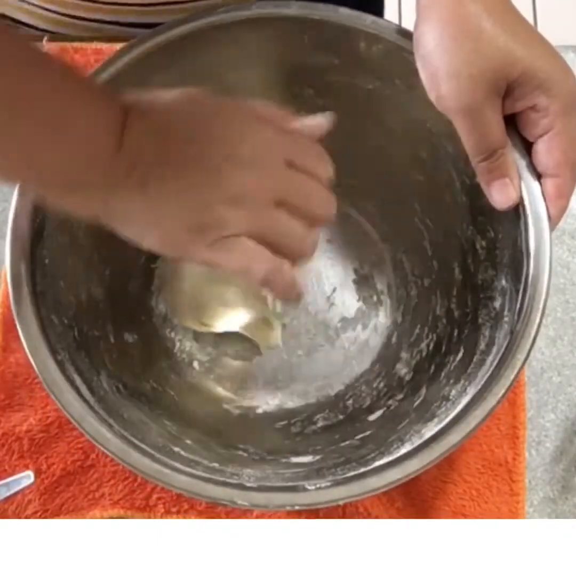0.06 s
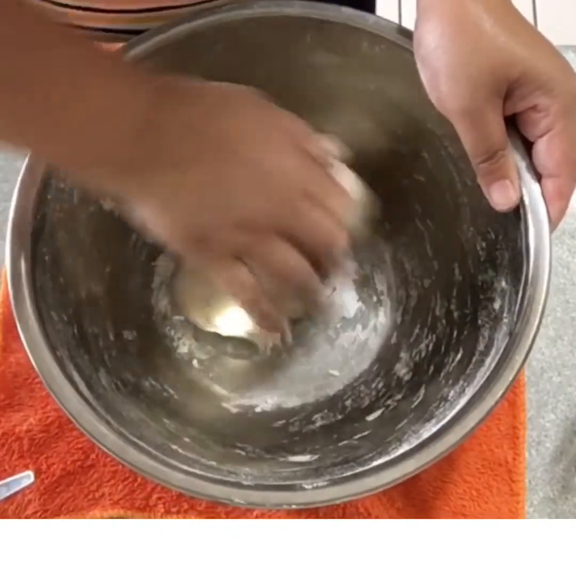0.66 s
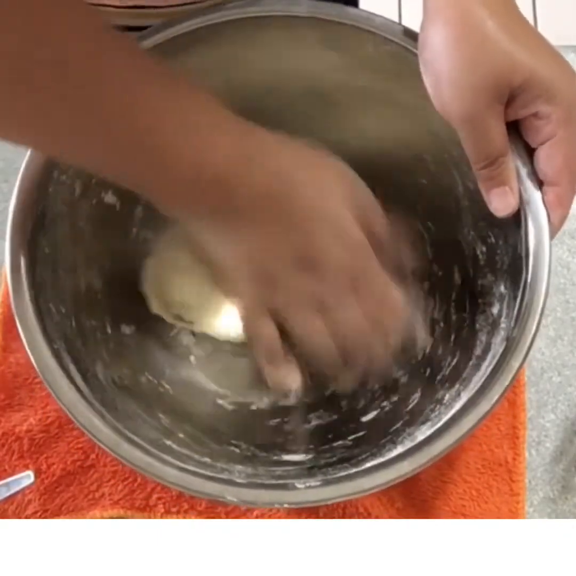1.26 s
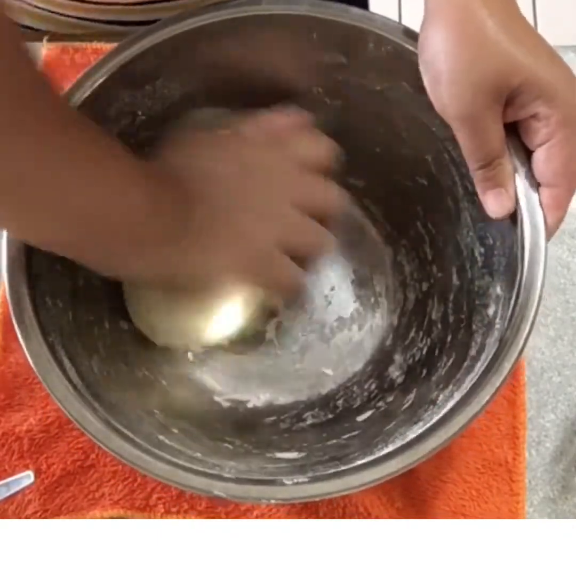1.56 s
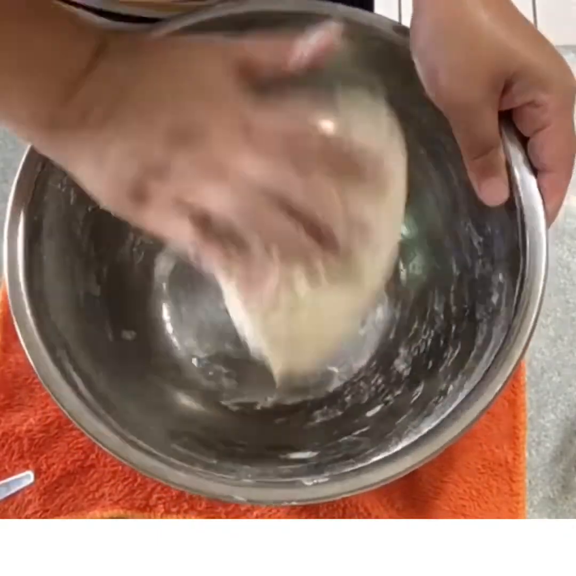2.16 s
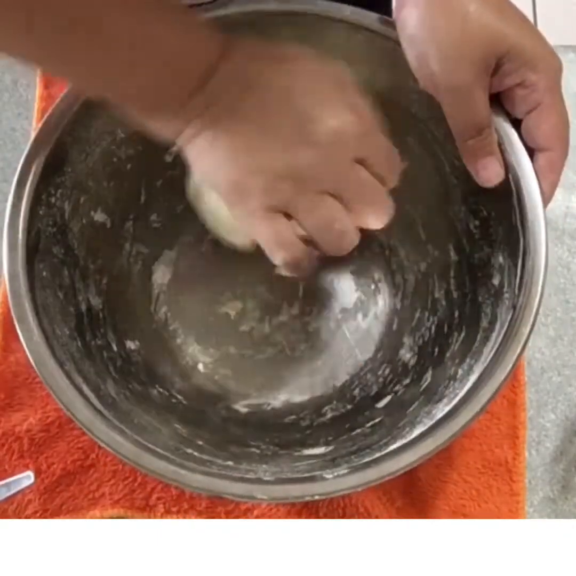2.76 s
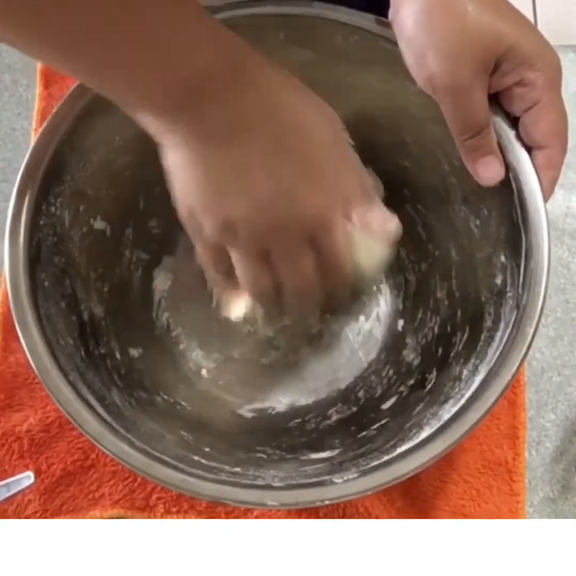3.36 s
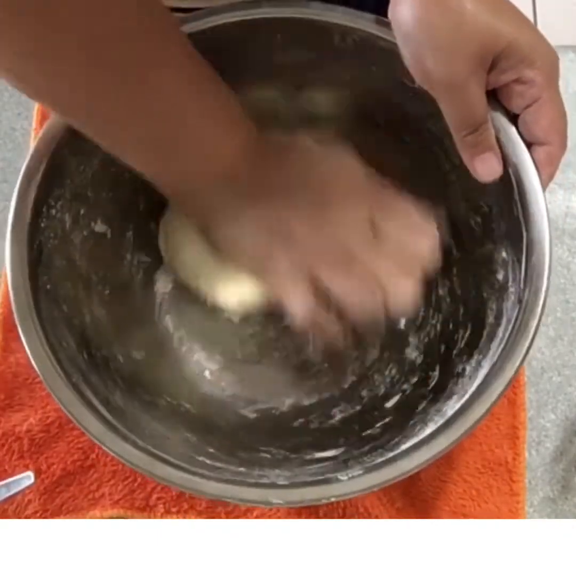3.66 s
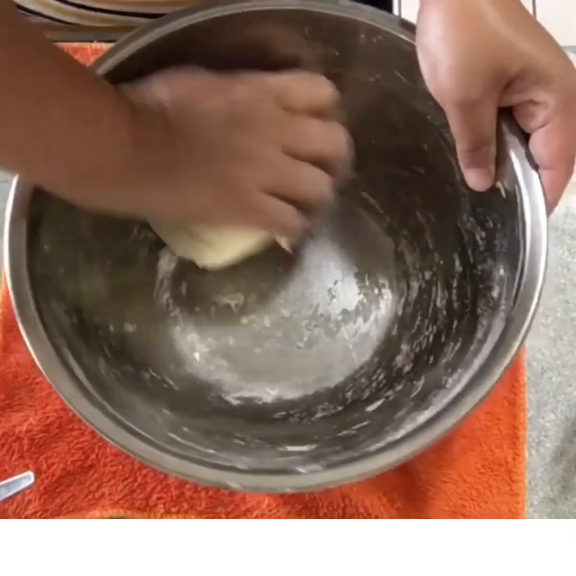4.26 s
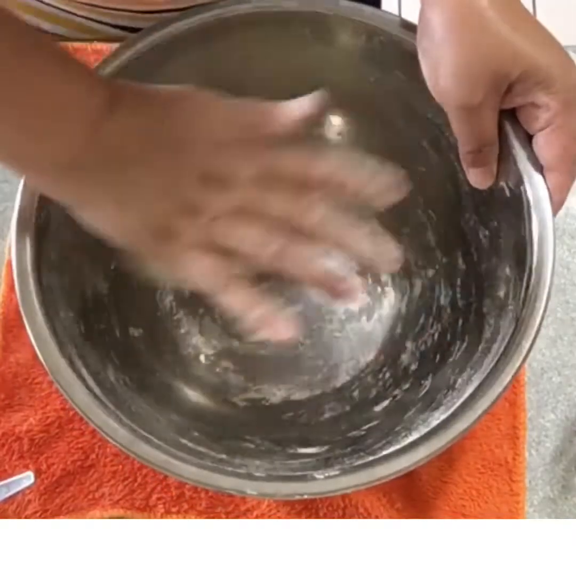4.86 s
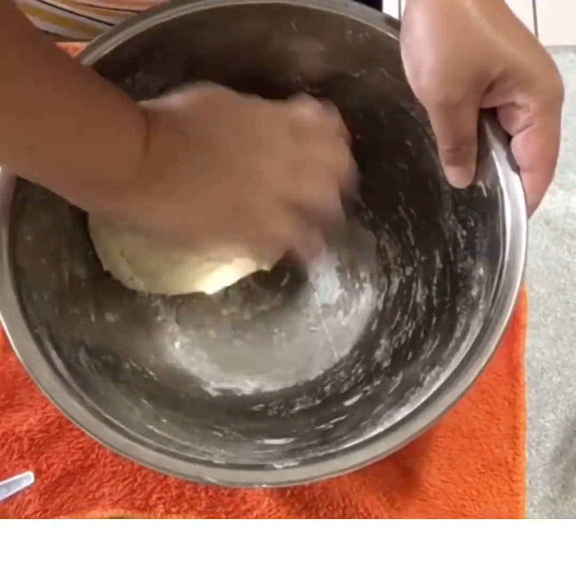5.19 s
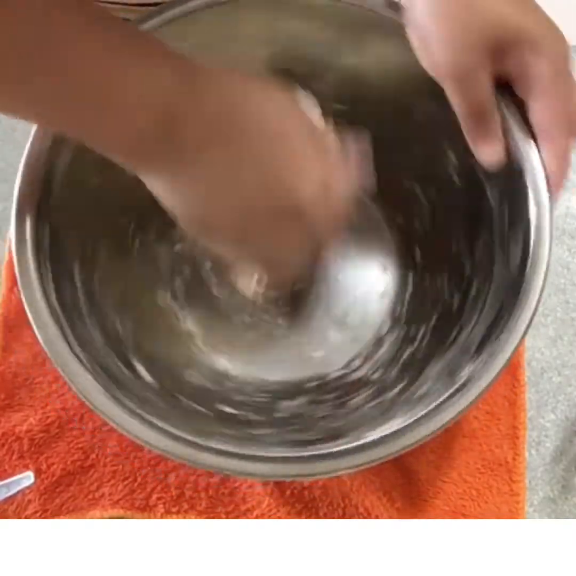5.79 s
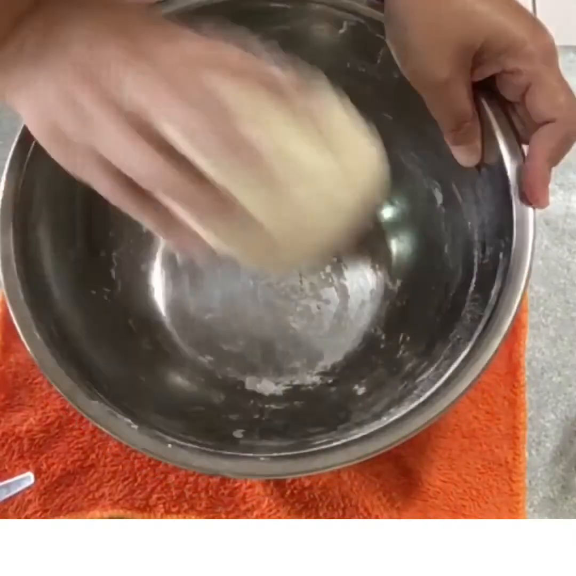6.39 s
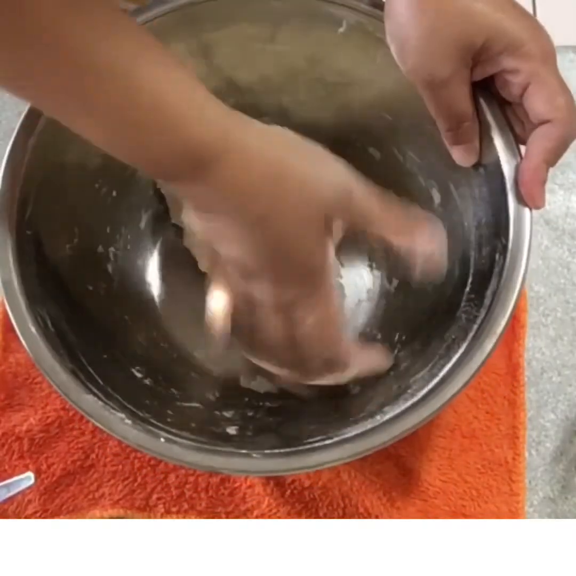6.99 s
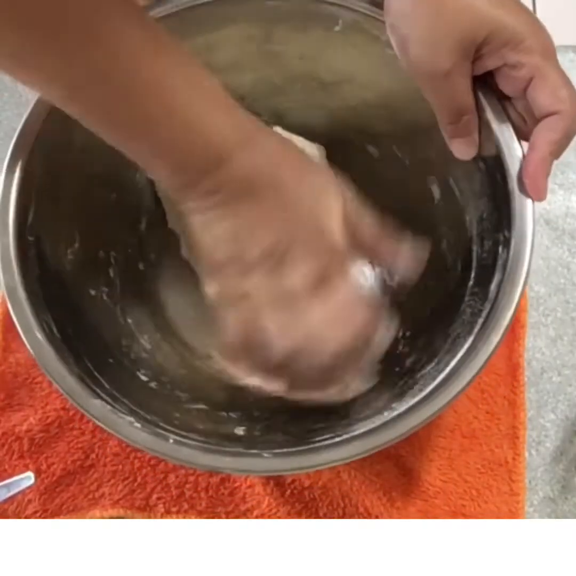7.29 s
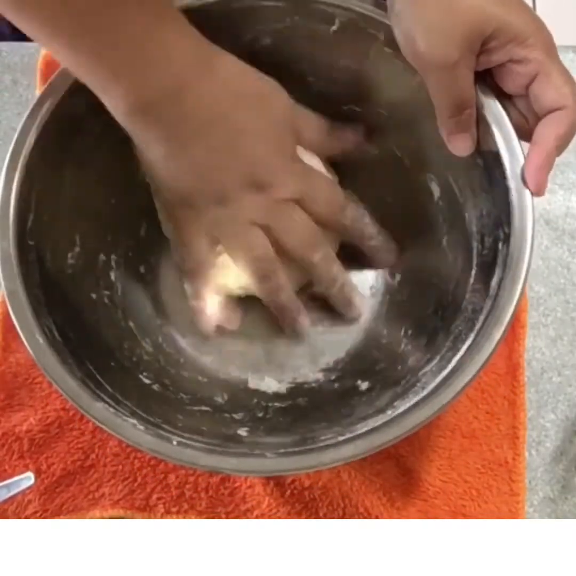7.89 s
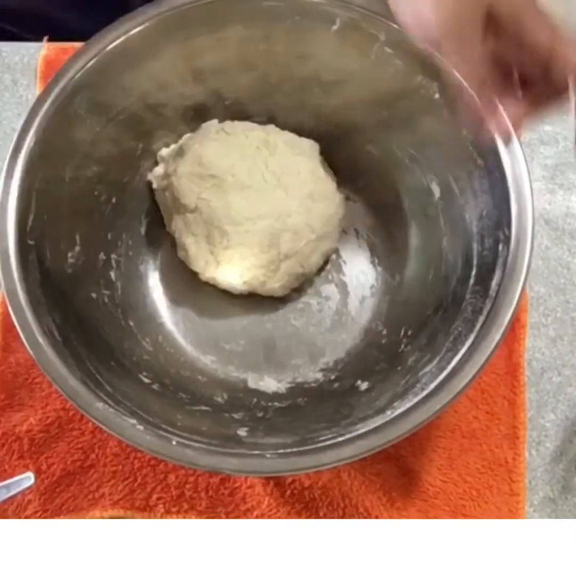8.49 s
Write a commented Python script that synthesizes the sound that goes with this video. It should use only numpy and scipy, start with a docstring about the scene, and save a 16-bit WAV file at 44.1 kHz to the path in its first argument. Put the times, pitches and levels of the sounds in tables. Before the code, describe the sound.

Dough rubs and squelches quietly against a metal mixing bowl, broken by low thumps and pats as it is dropped and pressed.

```python
"""In a small kitchen, a hand kneads dough in a steel bowl that stands on a towel.
Friction of skin and dough on the wall hisses and rasps. The ball is dropped and patted: each impact
expels trapped air or thuds through the table, and a finger ring excites the modes of the steel.
The bowl is turned once, scraping; a soft hiss swells near the end."""
import sys
import numpy as np
from scipy import signal
from scipy.fft import rfft, irfft, next_fast_len
from scipy.io import wavfile
from scipy.ndimage import uniform_filter1d

SR = 44100
rng = np.random.default_rng(int(sys.argv[2]) if len(sys.argv) > 2 else 0)


def output_pcm(signal):
    """Save a mono or channel-first signal as 16-bit PCM at the path in sys.argv[1].

    Samples are clipped to [-1, 1] before scaling.
    """
    pcm = np.clip(np.atleast_2d(signal).T, -1, 1) * 32767
    wavfile.write(sys.argv[1], SR, np.round(pcm).astype(np.int16))


N = 376505


def amp(db):
    """Amplitude grows tenfold every 20 dB."""
    return 10 ** (np.asarray(db) / 20)

def unit(x):
    """Normalisation to rms 1."""
    return x / np.sqrt(np.mean(x ** 2) + 1e-20)

def along(points, hz):
    """Interpolation of (frequency, value) points on a logarithmic axis."""
    f, v = np.transpose(points)
    return np.interp(np.log(hz + 1), np.log(f), v)

def filtered(x, response):
    """Linear filtering multiplies the spectrum by a frequency response."""
    m = next_fast_len(len(x) + len(x) // 20, True)
    return irfft(rfft(x, m) * response(np.fft.rfftfreq(m, 1 / SR)), m)[:len(x)]

def coloured(x, spectrum):
    """Spectral shaping, at rms 1."""
    return unit(filtered(x, lambda hz: amp(along(spectrum, hz))))

def resonant(x, peaks):
    """Forced response of damped resonators of alternating sign, at rms 1."""
    def response(f):
        return sum((-1) ** k * amp(db) * 1j * f * width / (hz * hz - f * f + 1j * f * width)
                   for k, (hz, width, db) in enumerate(peaks))
    return unit(filtered(x, response))

def crackle(count, spread_db):
    """Stick-slip noise: dense tiny slips of log-normal size."""
    noise = rng.standard_normal(count)
    sizes = amp(spread_db * rng.standard_normal(count // 16 + 1))
    return noise * np.repeat(sizes, 16)[:count]

def add(track, start_s, sound):
    """Superposition of a sound on a track."""
    start = round(start_s * SR)
    track[start:start + len(sound)] += sound[:N - start]

def clock():
    """Envelopes vary slowly, so a coarse time axis in seconds serves."""
    return np.arange(0, N, 64) / SR

def smooth(gain):
    """Linear interpolation of an envelope to every sample."""
    return np.interp(np.arange(N) / SR, clock(), gain)

def envelope(start, attack, hold, release, db):
    """A soft rise, a hold, then exponential decay of 20 dB per release time; times in seconds."""
    t = clock() - start
    rise = np.sin(np.pi / 2 * np.clip(t / attack, 0, 1)) ** 2
    return rise * amp(db - 20 * np.maximum(t - attack - hold, 0) / release)

# The kitchen's background. Each row: frequency in Hz, relative spectral density in dB.
RUMBLE_SPECTRUM = [(15, -37.5), (25, -6.5), (76, 3.5), (211, -10.5), (276, -4), (449, -27.5), (654, -16),
                   (769, -23), (1550, -27.5), (4210, -37.5), (4820, -42.5), (6490, -40.5), (7630, -46),
                   (13400, -50), (15800, -49.5)]
def rumble():
    """Stationary noise with its power in the bass."""
    return amp(-67.5) * coloured(rng.standard_normal(N), RUMBLE_SPECTRUM)

def tension(start, length, db, attack=0.0079, growth_db=7.5):
    """Under rising tension a pull grows louder until the dough lets go."""
    slack = np.clip(1 - (clock() - start) / length, 0, 1)
    return envelope(start, attack, length - attack, release=0.023, db=db - growth_db * slack)

def ticks(count, centre_hz, spread_db):
    """Threads of dough let go of the wall at random, each a damped oscillation of its own pitch."""
    t = np.arange(SR // 100) / SR
    when, pitch, size = rng.random((count, 3)).T[:, :, None]
    hz = centre_hz * 2 ** (2.6 * (pitch - .5))
    blips = amp(spread_db * size ** 2) * np.sin(2 * np.pi * hz * t) * np.exp(-hz * t / 2)
    where = (when * N).astype(int) + np.arange(len(t))
    return unit(np.bincount(where.ravel(), blips.ravel(), N)[:N])

def shifting_gap(x, depth_db):
    """The cavity between hand and wall changes shape, so narrow resonances come and go."""
    spectra = signal.stft(x, nperseg=512)[2]
    field = uniform_filter1d(rng.standard_normal(spectra.shape), size=4, axis=0)
    field = uniform_filter1d(field, size=12, axis=1)
    return signal.istft(spectra * unit(amp(depth_db * unit(field))), nperseg=512)[1][:N]

# Dough is pulled off the wall. Each row: start and length in seconds, relative level in dB.
DOUGH_PULLS = [(0.0, 0.1, -73.5), (0.573, .085, -71.5), (0.675, .085, -69.5), (1.29, 0.1, -65.5),
               (1.753, .095, -74), (2.637, 0.062, -70.5), (3.277, 0.083, -71.5), (3.399, 0.09, -66),
               (4.01, 0.11, -63), (4.545, 0.12, -70.5), (5.858, .09, -78), (6.027, 0.022, -64)]
# The hand's heel pushes the ball. Each row: start and hold in seconds, relative level in dB.
HEEL_PUSHES = [(0.188, 0.052, -72.5), (0.879, 0.074, -69.5), (1.529, 0.096, -73), (2.878, 0.062, -72),
               (3.592, 0.078, -75.5), (4.268, 0.12, -72), (5.269, 0.078, -80), (6.953, 0.021, -73),
               (7.347, 0.0063, -69.5)]
# The hand rubs lightly. Each row: start and hold in seconds.
LIGHT_RUBS = [(0.188, 1.66), (2.9, 1.58), (5.3, .6)]
# Fingers slide on the wall. Each row: start, rise and fall in seconds, relative level in dB.
FINGER_SLIDES = [(0.38, 0.038, 0.73, -74.5), (0.551, 0.062, 0.037, -76), (1.098, 0.028, 0.047, -52),
                 (1.15, 0.11, 0.077, -73.5), (1.292, 0.079, 0.11, -55), (2.534, 0.03, 0.056, -65.5),
                 (3.089, 0.036, 0.068, -63.5), (3.13, 0.19, 0.066, -70), (3.795, 0.022, 0.12, -68),
                 (3.99, 0.1, 0.027, -56.5), (4.11, 0.075, 0.33, -74), (5.45, 0.11, .16, -63.5),
                 (5.68, 0.092, 0.088, -69.5), (7.015, .022, 0.021, -66), (7.275, .008, 0.061, -66.5)]
# Slow skin, fast skin, smearing dough and tearing dough.
# Each row: frequency in Hz, relative spectral density in dB.
SLOW_SPECTRUM = [(3000, -21.5), (4800, -14.5), (5600, -2), (6700, 2), (7500, -7.5), (10000, -16),
                 (15000, -20.5)]
FAST_SPECTRUM = [(3000, -30), (5200, -22), (6200, -1), (6950, 5), (7700, -7.5), (9000, -9.5),
                 (10500, -27.5), (15000, -23.5)]
SMEAR_SPECTRUM = [(150, -15), (400, 2), (700, -4.5), (1050, 0.5), (1600, -1.5), (2300, -2), (3100, -3),
                  (4400, -3.5), (7000, -16.5), (14000, -16)]
RASP_SPECTRUM = [(4000, -23.5), (8500, 0), (12500, -1), (15500, -9)]
def kneading():
    """Sliding friction: skin hisses, higher when fast; tacky dough smears, ticks and rasps."""
    pull = sum(tension(*row) for row in DOUGH_PULLS)
    push = sum(envelope(s, 0.039, hold, 0.066, db) for s, hold, db in HEEL_PUSHES)
    rub = sum(envelope(s, 0.039, hold, 0.023, db=-83) for s, hold in LIGHT_RUBS)
    fingers = sum(envelope(s, rise, 0, fall, db) for s, rise, fall, db in FINGER_SLIDES)
    # Incoherent sources add in power.
    slide = smooth(np.linalg.norm([fingers, push, amp(-9.5) * pull, amp(-7.5) * rub], axis=0))
    smear = smooth(np.linalg.norm([amp(-18.5) * fingers, amp(-3.5) * push, pull, rub], axis=0))
    fast_share = slide ** 2 / (slide ** 2 + amp(-62) ** 2)  # stronger strokes turn bright
    slow_hiss = coloured(crackle(N, spread_db=2.5), SLOW_SPECTRUM)
    fast_hiss = coloured(crackle(N, spread_db=2.5), FAST_SPECTRUM)
    hiss = slide * (np.sqrt(1 - fast_share) * slow_hiss + np.sqrt(fast_share) * fast_hiss)
    dough = amp(-2) * coloured(crackle(N, spread_db=2.5), SMEAR_SPECTRUM)
    dough += amp(-5.5) * ticks(count=1400, centre_hz=2090, spread_db=23)
    tearing = amp(-15) * smooth(pull + amp(-2.5) * push)
    rasp = tearing * coloured(crackle(N, spread_db=6.5), RASP_SPECTRUM)
    return shifting_gap(amp(-1.5) * hiss + smear * dough, depth_db=3) + rasp

# The smack and its sticky edge. Each row: frequency in Hz, relative spectral density in dB.
SMACK_SPECTRUM = [(700, -31.5), (1150, 3), (1550, -10.5), (2100, -2.5), (2600, -6.5), (3400, -8.5),
                  (4500, -5.5), (5500, -20), (8000, -24), (15000, -28.5)]
STICKY_SPECTRUM = [(4000, -17), (5600, 2), (6900, 6.5), (8200, -8.5), (11000, -16.5), (15500, -25)]
def burst(smack_db, pocket_db, pocket_hz, pocket_shape, sticky_db, rise, t60):
    """A soft collision is many tiny impacts: a smack, a pop of trapped air and a sticky edge."""
    t = np.arange(SR // 10) / SR
    pocket = [(multiple * pocket_hz, db) for multiple, db in pocket_shape]
    parts = (smack_db, SMACK_SPECTRUM), (pocket_db, pocket), (sticky_db, STICKY_SPECTRUM)
    sound = sum(amp(db) * coloured(crackle(len(t), spread_db=2.5), colour) for db, colour in parts)
    return amp(-3) * sound * (1 - np.exp(-t / rise)) * amp(-60 * t / t60)

# Each row: start in seconds, relative smack and air pocket levels in dB, pocket pitch in Hz,
# relative sticky treble level in dB, 60 dB decay time in seconds.
SLAP_HITS = [(0.106, -53.5, -70, 910, -69, 0.014), (0.643, -58, -63, 800, -76, 0.02),
             (2.2652, -37, -40, 920, -47.5, 0.046), (2.287, -42, -40, 1630, -48, 0.093),
             (2.653, -64.5, -67, 700, -77, .035), (4.9292, -56, -60.5, 1010, -59.5, 0.063),
             (4.945, -42, -39.5, 1800, -55.5, 0.026), (5.949, -52.5, -53, 1080, -77.5, 0.012),
             (6.030, -73, -70.5, 600, -71, 0.053), (6.5076, -35, -26.5, 1136, -40, 0.023),
             (6.516, -34.5, -32, 1570, -56, 0.045), (6.861, -58, -53, 690, -85.5, 0.063),
             (6.867, -46.5, -52, 700, -78, 0.018), (7.2476, -50, -53.5, 750, -75, 0.023),
             (7.603, -57.5, -56, 1020, -78, 0.045), (7.935, -35, -45, 850, -39.5, 0.026),
             (7.941, -38.5, -40, 1060, -54, 0.025), (8.24, -50, -49, 614, -57, 0.056),
             (8.245, -42.5, -49.5, 1110, -67, 0.032)]
# Trapped air. Each row: multiple of the pocket's pitch, relative spectral density in dB.
SLAP_POCKET = [(.25, -6), (0.701, -14.5), (1, 1.5), (1.3, -12.5), (1.999, -20), (5, -55)]
def slaps():
    """The impact of palm or ball excites the resonance of an air pocket."""
    out = np.zeros(N)
    for s, smack_db, pocket_db, hz, sticky_db, t60 in SLAP_HITS:
        add(out, s, burst(smack_db, pocket_db, hz, SLAP_POCKET, sticky_db, rise=0.0007, t60=t60))
    return out

# Dough and hand land. Each row: start in seconds, relative level in dB, the knock's offset in dB.
LANDINGS = [(0.217, -61, -20), (0.645, -46, -18), (0.889, -40.5, -40), (2.271, -18.5, -18.5),
            (2.28, -24.5, -20), (2.577, -47.5, -28), (3.354, -46.5, -31), (3.592, -50, -18),
            (3.803, -56.5, -8), (4.289, -52, -24), (4.942, -29.5, -26.5), (6.064, -47.5, -19),
            (6.099, -40.5, -30), (6.512, -24.5, -18.5), (6.882, -38.5, -12), (7.264, -42, -28),
            (7.608, -53, -32), (7.947, -36, -25), (8.249, -38.5, -24.5)]
# The bowl rocks. Each row: frequency in Hz, relative level in dB, 60 dB decay time in seconds.
ROCKING_MODES = [(54.6, -9.5, 0.29), (77.4, -4.5, 0.18), (87.1, -0.5, 0.17), (156.1, -4, 0.095),
                 (222, -17.5, 0.06)]
# The bowl's base. Each row: frequency in Hz, relative spectral density in dB.
KNOCK_SPECTRUM = [(100, -29), (160, 6.5), (220, -10), (295, -1.5), (345, -21.5), (700, -63)]
def thuds():
    """Soft, heavy impacts knock the bowl's base and excite its low modes on towel and table."""
    out, t = np.zeros(N), np.arange(SR // 4) / SR
    for s, db, knock_db in LANDINGS:
        scatter = rng.standard_normal((len(ROCKING_MODES), 2))
        rocking = np.zeros(len(t))
        for (hz, level, t60), (stray_db, detune) in zip(ROCKING_MODES, scatter):
            phase = 2 * np.pi * hz * (1 + 0.043 * detune) * t
            rocking += amp(level + stray_db - 60 * t / t60) * np.sin(phase)
        noise = coloured(rng.standard_normal(len(t)), KNOCK_SPECTRUM)
        knock = amp(knock_db + 8.5 - 60 * t / 0.15) * noise
        add(out, s, amp(db - 0.5) * (rocking + knock) * (1 - np.exp(-t / 0.0077)))
    return out

# Each row: start in seconds, relative air pocket level in dB, pocket pitch in Hz,
# relative sticky treble level in dB.
FINGER_PRESSES = [(1.106, -52, 940, -55), (1.343, -53.5, 880, -60), (2.282, -33, 610, -68),
                  (2.52, -67, 600, -63), (2.559, -57.5, 600, -73), (3.114, -59.5, 1090, -54),
                  (3.804, -49.5, 537, -56.5), (3.965, -67, 800, -64.5), (4.058, -57, 735, -60),
                  (4.659, -58, 550, -84.5), (6.5233, -42, 570, -49), (6.880, -44, 570, -58.5),
                  (7.2618, -62, 604, -69), (7.2774, -48.5, 560, -51.5)]
# Escaping air. Each row: multiple of the pocket's pitch, relative spectral density in dB.
SQUELCH_POCKET = [(.25, -0.5), (.6, -4.5), (.95, 0.5), (1.3, -5.5), (2, -15), (5, -50.5)]
def squelches():
    """Compression by the fingers drives air from under the dough, with little smack."""
    out = np.zeros(N)
    for s, db, hz, sticky_db in FINGER_PRESSES:
        add(out, s, burst(db - 18.5, db, hz, SQUELCH_POCKET, sticky_db, rise=0.0013, t60=0.073))
    return out

# Hard taps, as of a finger ring. Each row: start in seconds, relative level in dB.
HARD_TAPS = [(2.287, -46.5), (2.294, -43), (2.304, -50), (6.518, -63.5)]
# The bowl rings. Each row: frequency in Hz, relative level in dB, 60 dB decay time in seconds.
STEEL_MODES = [(822, -16.5, .25), (1020, -9, 0.29), (2200, 1.5, 0.075), (3930, -6.5, 0.16),
               (5600, -8.5, 0.1126), (5870, 0, 0.14), (8200, -10, 0.11), (10840, -12.5, 0.11),
               (12300, -17, 0.168), (13220, -22.5, .14), (13400, -19, 0.14), (15280, -23.5, .15)]
def clinks():
    """Hard impacts tick and excite the steel's modes; the hand on the rim damps and broadens them."""
    out, t = np.zeros(N), np.arange(SR // 4) / SR
    for s, db in HARD_TAPS:
        add(out, s, amp(db - 5.5 - 60 * t / 0.08) * rng.standard_normal(len(t)))
        for hz, level, t60 in STEEL_MODES:
            phase = 2 * np.pi * (hz * t + rng.random())
            phase += 0.055 * np.cumsum(rng.standard_normal(len(t)))
            mode = amp(db + level + 1.5 - 60 * t / t60) * np.sin(phase)
            add(out, s, mode * (1 - np.exp(-t / 0.00073)))
    return out

# The bowl swivels. Each row: start and hold in seconds, relative level in dB.
BOWL_TURNS = [(5.455, .11, -67), (5.693, 0.029, -67)]
# Each row: centre frequency and bandwidth in Hz, relative gain in dB.
SCRAPE_RESONANCES = [(1133, 33, -3), (2160, 77, -6.5), (2320, 23, -3), (2840, 52, -3), (3050, 35, -13),
                     (3485, 28, 2.5), (3900, 31, -6), (4150, 110, -1.5), (4800, 150, -8), (5350, 28, 1)]
def swivel():
    """Friction drives narrow resonances of the wall as the bowl turns."""
    turn = smooth(sum(envelope(s, 0.07, hold, 0.074, db) for s, hold, db in BOWL_TURNS))
    return amp(-4.5) * turn * resonant(crackle(N, spread_db=4.5), SCRAPE_RESONANCES)

# Each row: centre frequency and bandwidth in Hz, relative gain in dB.
PEEL_RESONANCES = [(500, 31, 7.5), (1020, 28, 1), (1468, 17, 7.5), (1683, 31, -2), (2005, 33, 1.5),
                   (2927, 22, 7), (3890, 40, -13), (5700, 70, -11.5)]
def squeak():
    """Lifted dough peels off the steel and excites narrow resonances."""
    lift = smooth(envelope(start=6.028, attack=0.028, hold=0.027, release=0.022, db=-63.5))
    return lift * resonant(rng.standard_normal(N), PEEL_RESONANCES)

# Swell and brush alike. Each row: frequency in Hz, relative spectral density in dB.
HISS_SPECTRUM = [(400, -15), (1200, -2.5), (2000, 4.5), (2900, 6.5), (3600, 1.5), (4550, 3), (4950, -2.5),
                 (6800, -8.5), (9000, -16.5), (15000, -29)]
def swell_and_brush(peak_s=8.08, rise_db_per_s=31, fall_db_per_s=22.5):
    """A soft hiss grows and decays exponentially; the palm brushes off the ball with friction noise."""
    t = clock() - peak_s
    level_db = -67.5 + np.minimum(rise_db_per_s * t, -fall_db_per_s * t)
    swell = smooth(amp(level_db)) * coloured(rng.standard_normal(N), HISS_SPECTRUM)
    brush = smooth(envelope(start=7.986, attack=0.005, hold=0, release=0.099, db=-51.5))
    return swell + brush * coloured(crackle(N, spread_db=3.5), HISS_SPECTRUM)

def echoes(x, decay):
    """Reverberation: convolution with a diffuse tail in which each frequency dies at its own rate."""
    hz, t, spectra = signal.stft(rng.standard_normal(SR // 2), SR, nperseg=256)
    tail = signal.istft(spectra * amp(-60 * t / along(decay, hz)[:, None]), SR, nperseg=256)[1]
    return signal.oaconvolve(x, np.pad(tail, (64, 0)) / np.linalg.norm(tail))[:N]

# Each row: frequency in Hz, reverberation time in seconds.
BOWL_DECAY = [(100, 0.042), (1000, 0.16), (6000, 0.031), (15000, 0.061)]
KITCHEN_DECAY = [(80, 0.6), (300, 0.28), (1500, 0.29), (6000, 0.33), (15000, 0.22)]
def scene():
    """Superposition: the contacts and their echoes in bowl and kitchen add to a steady rumble."""
    contact = kneading() + slaps() + squelches() + swivel() + squeak()
    bowl = contact + amp(-18) * echoes(contact, BOWL_DECAY) + clinks()
    table = thuds()
    room = amp(-10) * echoes(bowl + amp(-0.5) * table, KITCHEN_DECAY)
    return (bowl + table + room + rumble() + swell_and_brush())[None]

def record(dry, bass_hz=44, top_hz=15800):
    """The microphone is a band-pass: it thins the deepest bass and keeps nothing above its limit."""
    bass_cut = signal.butter(4, bass_hz, "highpass", fs=SR, output="sos")
    return filtered(signal.sosfilt(bass_cut, dry[0]), lambda hz: hz < top_hz)[None]

dry = scene()
out = record(dry)
output_pcm(out)
```